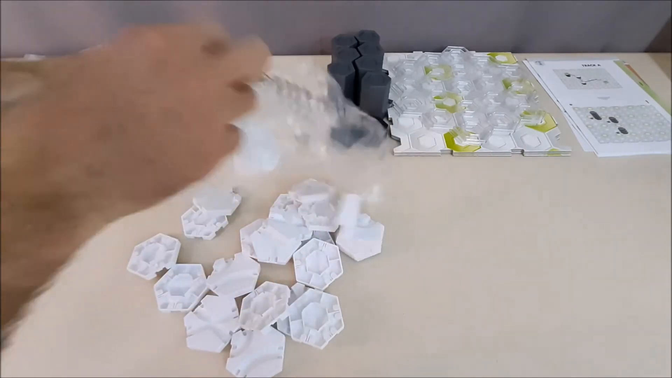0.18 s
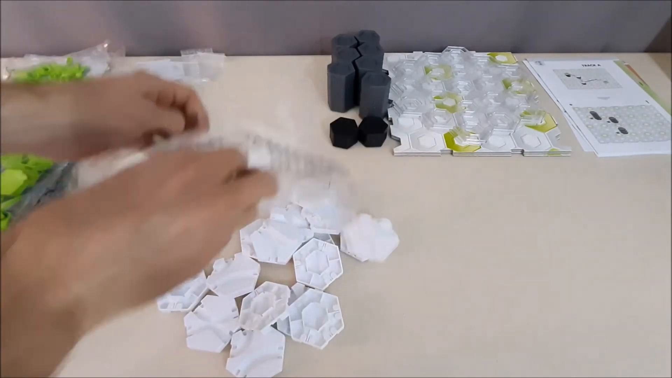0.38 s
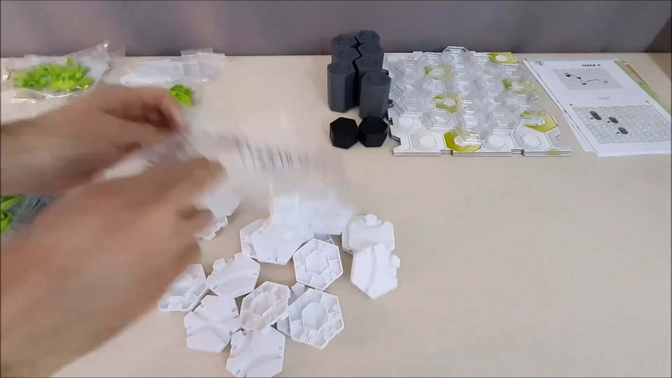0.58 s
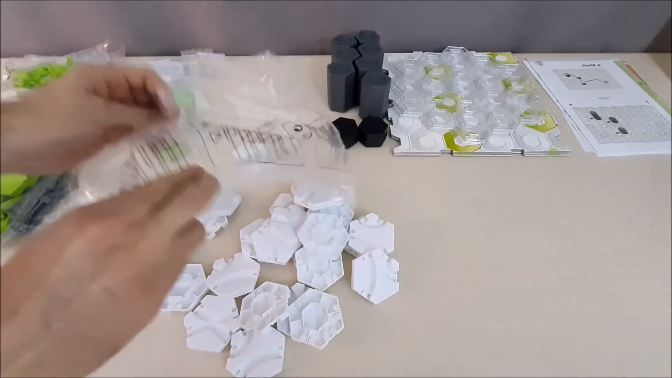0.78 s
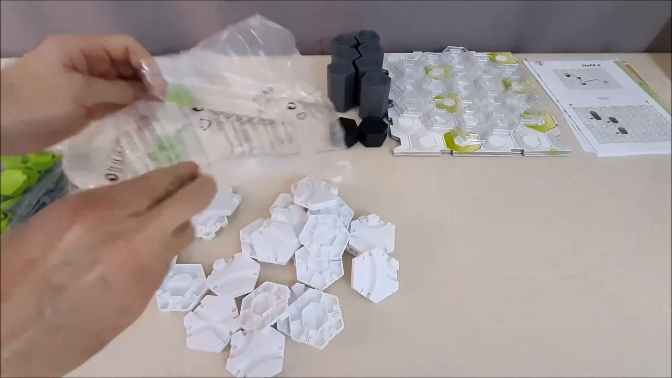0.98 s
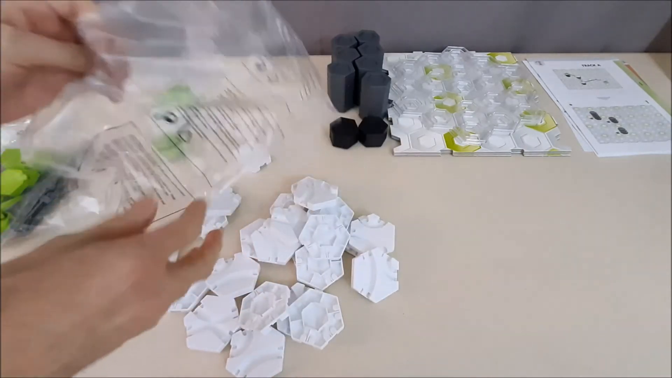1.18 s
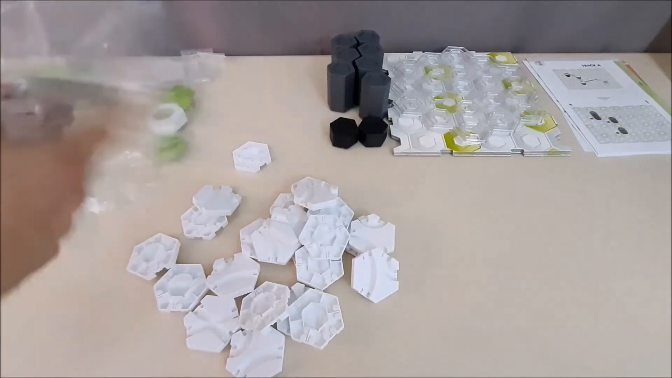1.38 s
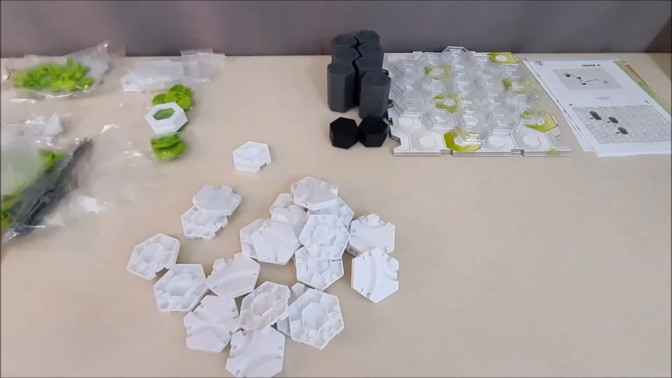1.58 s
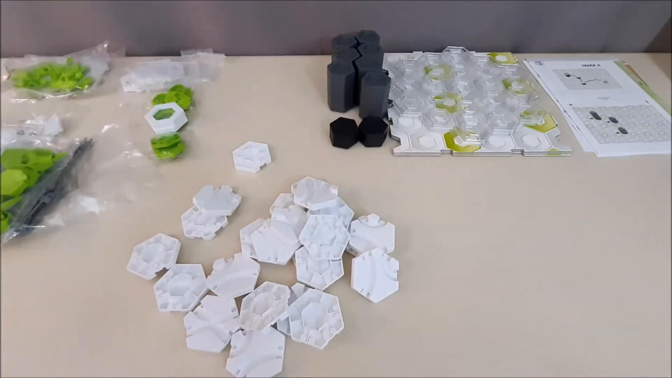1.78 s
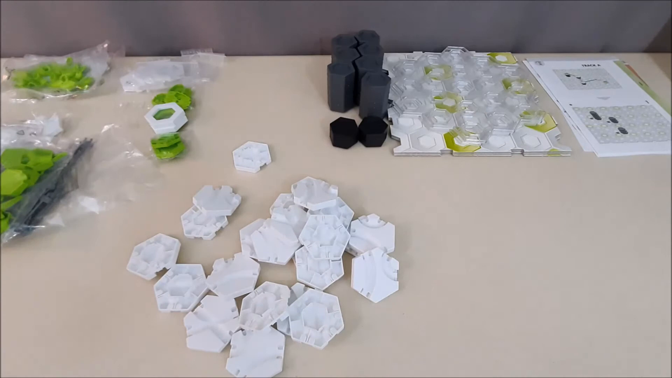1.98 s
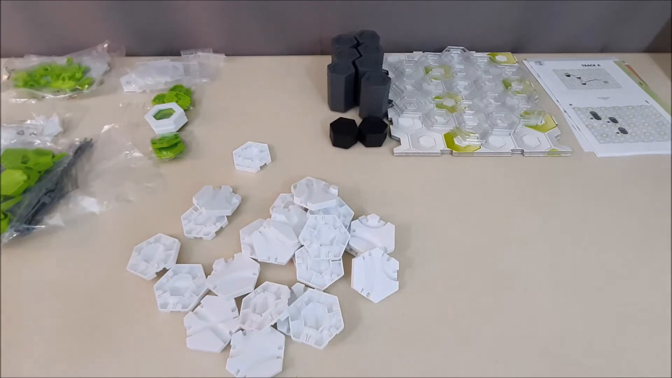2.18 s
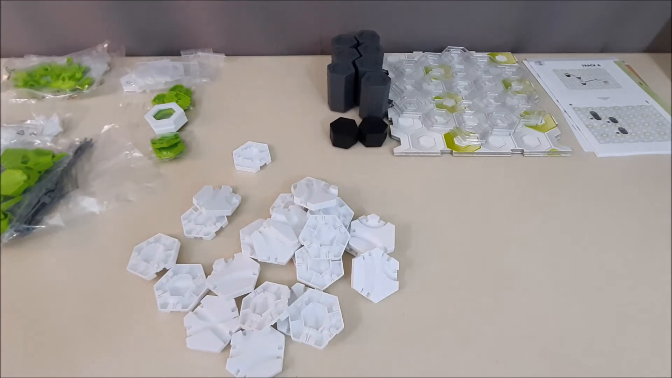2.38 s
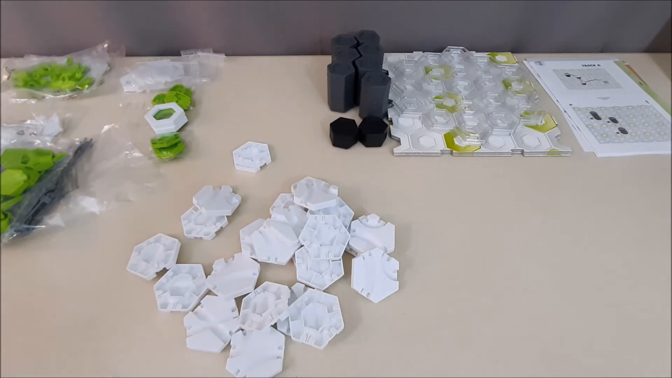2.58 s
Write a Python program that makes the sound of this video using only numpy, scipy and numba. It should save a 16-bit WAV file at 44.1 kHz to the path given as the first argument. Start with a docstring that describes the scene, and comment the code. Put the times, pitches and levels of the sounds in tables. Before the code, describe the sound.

Hollow plastic tiles spill onto a table. Faint thin-bag crinkles come first, then at 0.2 seconds a sudden dense clatter with bright clacks, a brief thinning, and a second cluster around 0.55-0.7. Small knocks settle until about 1.0. After a near pause, the empty bag crinkles and snaps from 1.1, strongest at 1.35-1.8, slightly left, fading by 2.4. Low table bumps, close small quiet room.

```python
"""Crinkles and snaps of a thin plastic bag, then hollow plastic tiles tumble from it onto a table.
Clacks ring tile modes with a noise crack and a board thud; small knocks chatter as the tiles settle.
The empty bag then crinkles and snaps as it is drawn away: short creases, ticks, snaps and a low rustle.
Deep bumps rumble through the table; a small quiet room adds a diffuse tail and faint floor noise."""
import sys
import numpy as np
from scipy import signal
from scipy.fft import rfft, irfft
from scipy.io import wavfile
from scipy.ndimage import uniform_filter1d
from numba import njit

SR = 44100
rng = np.random.default_rng(int(sys.argv[2]) if len(sys.argv) > 2 else 0)


def natural_amplitude(level_db):
    """Convert a level in decibels to a linear amplitude factor, elementwise."""
    exponent = np.asarray(level_db, float) / 20
    return 10 ** exponent


def put_to_file(sound):
    """Save the sound as 16-bit audio at rate SR, in the file named by the first command-line argument."""
    columns = np.atleast_2d(sound).T  # one column per channel
    safe = np.clip(columns, -1, 1)
    whole_steps = np.round(safe * 32767)
    wavfile.write(sys.argv[1], SR, whole_steps.astype(np.int16))


N = 114660

# floor noise spectrum: f/Hz, relative density/dB
FLOOR_COLOUR = [(18, -33), (30, -15), (90, -6.5), (540, -11), (1600, 2), (8740, -21), (16000, -23)]
# room tail: f/Hz, level/dB, t60/s
ROOM_TAIL = [(125, -10, 0.095), (500, -6, 0.23), (2000, -5, 0.24), (6040, -8, 0.089), (12000, -8, 0.037)]
# rumble as hands and bag bump the table: t/s, level/dB
RUMBLE_LEVEL = [(0, -61), (.1, -54.5), (.17, -67), (.24, -41), (.4, -80), (.7, -48), (.85, -61), (1.0, -67),
                (1.25, -75), (1.34, -56), (1.38, -44.5), (1.45, -47), (1.5, -77), (1.62, -75), (1.75, -58),
                (1.82, -69), (1.87, -93), (2.05, -89), (2.2, -75), (2.4, -82), (2.6, -78)]
# rumble spectrum: f/Hz, relative density/dB
RUMBLE_COLOUR = [(15, -18), (35, 0), (65, -3.5), (110, -5), (200, -35.5), (500, -78.5)]
# bag handling: t/s, crinkle level/dB, low rustle level/dB, delay of left/samples
BAG_HANDLING = [(0, -52.5, -56, -7.5), (.04, -42.5, -55.5, 7), (.12, -39, -58, 6.5),
                (.205, -46, -54.5, 5.5), (.235, -18.5, -42, -4), (.4, -52, -43.5, 4.5),
                (.46, -37, -44.5, -2.5), (.55, -48, -41.5, -0.5), (.7, -25, -37, -0.5),
                (.9, -42, -43.5, -5), (1.04, -73, -64, -12.5), (1.09, -56, -60, -9.5),
                (1.14, -40.5, -53, -10), (1.21, -64, -66.5, -11.5), (1.25, -54.5, -64, -11),
                (1.31, -43.5, -59, -16), (1.36, -34, -43.5, -11.5), (1.4, -30.5, -40, -14),
                (1.46, -29.5, -44.5, -17.5), (1.5, -35, -50.5, -15), (1.54, -32.5, -54, -19.5),
                (1.63, -32, -50.5, -18.5), (1.73, -44.5, -54.5, -20.5), (1.8, -29.5, -46.5, -18.5),
                (1.87, -40, -61.5, -17), (1.95, -34.5, -54.5, -22.5), (2.08, -36, -68, -20.5),
                (2.16, -46.5, -75, -21.5), (2.23, -59, -87, -21.5), (2.31, -42, -67.5, -25.5),
                (2.42, -54, -74, -19.5), (2.475, -58.5, -78.5, -26.5), (2.6, -76.5, -83, -20)]
# bag position: t/s, left over right/dB
BAG_PAN = [(.6, 0), (1.1, 1.6), (1.4, 2.6), (2.1, 1.8), (2.4, 0)]
# gain of crinkle treble above 6 kHz: t/s, gain/dB
BAG_TREBLE = [(0, -5), (.25, -5), (.5, -5.5), (.7, -6.5), (1, -23.5), (1.18, -0.5), (1.3, -11),
              (1.42, -4.5), (1.53, -1.5), (1.7, -2.5), (1.8, 2.5), (1.95, -1), (2.1, -3.5), (2.3, -3.5),
              (2.42, -10.5), (2.47, 3), (2.6, -8)]
# film filter: f/Hz, gain/dB
FILM_COLOUR = [(300, -23), (700, -12.5), (1250, -7.5), (2030, -5.5), (2980, -4.5), (5000, -4.5), (7690, -4),
               (8790, -14.5), (11000, -6), (14000, -6), (15900, -7.5), (17000, -46)]
# rustle filter: f/Hz, gain/dB
RUSTLE_COLOUR = [(70, -22), (140, -3.5), (250, -1.5), (600, -6.5), (1200, -11.5), (3000, -64)]
# snaps of the film: t/s, relative level/dB, tone f/Hz
SNAPS = [(0.0286, -29.5, 2030), (0.0913, -31, 5000), (0.1162, -21, 4970), (0.192, -25, 5000),
         (1.064, -32.5, 3880), (1.0973, -35.5, 5760), (1.11, -42, 4900), (1.1187, -26, 3460),
         (1.1335, -32, 6430), (1.139, -43, 3730), (1.179, -19.5, 5700), (1.224, -31.5, 3950),
         (1.258, -29, 4700), (1.2721, -24.5, 5770), (1.284, -38, 5390), (1.304, -36, 7000),
         (1.3132, -26, 3030), (1.3208, -19, 3800), (1.34, -27, 3650), (1.378, -25, 4530),
         (1.3987, -12.5, 1750), (1.4084, -12.5, 5530), (1.4144, -18, 4430), (1.5274, -10.5, 5840),
         (1.5566, -20, 4800), (1.5656, -20, 2000), (1.5833, -25, 4870), (1.6232, -15, 2060),
         (1.7149, -20.5, 4800), (1.7655, -19, 2700), (1.788, -16, 6080), (1.792, -20, 4440),
         (1.8004, -14, 7700), (1.8124, -42, 3910), (1.8909, -20, 3990), (1.944, -20, 4120),
         (1.992, -20, 3820), (2.06, -34, 3350), (2.0955, -26, 1970)]
# settling tiles: t/s, relative level/dB, favoured mode f/Hz
CHATTER = [(.212, -58, 2810), (.224, -24.5, 2790), (.26, -24, 2823), (.32, -25, 2804), (.412, -40.5, 2835),
           (.445, -30, 2880), (.47, -27, 2890), (.55, -44.5, 2910), (.575, -31.5, 964), (.65, -21, 2000),
           (.71, -19, 2600), (.76, -46.5, 1500), (.8, -24.5, 1500), (.86, -36, 1500), (.9, -40.5, 1500),
           (.96, -42.5, 1500), (1.03, -60.5, 1500)]
# clacks: t/s, relative level/dB, favoured mode f/Hz, board thud re clack/dB, crack re clack/dB
CLACKS = [(0.2123, -19.5, 2604, -35.5, -1.5), (0.2219, -5.5, 1858, -18.5, 9.5),
          (0.2243, -8.5, 2705, -11, 3), (0.2299, -13.5, 2640, -23.5, -7), (0.2349, -10.5, 2703, -23.5, 8),
          (0.2408, -7, 5260, -34.5, 7.5), (0.247, -10, 2692, -21, 6.5), (0.257, -8.5, 2920, -19.5, 7.5),
          (0.266, -14.5, 2660, -18.5, -6), (0.273, -8.5, 2697, -14, -2.5), (0.285, -9, 2773, -19, -5),
          (0.2924, -6.5, 3007, -13.5, -14.5), (0.3, -17.5, 4420, -24, -3.5),
          (0.3085, -24.5, 2630, -24.5, 5), (0.349, -19.5, 2730, -13.5, -5), (0.4163, -11.5, 3280, -24, -2),
          (0.438, -18, 4460, -33.5, 4.5), (0.4422, -15, 2920, -10, 8.5), (0.446, -1, 2950, -31.5, -9),
          (0.453, -18, 2920, -40, -4.5), (0.4631, -18.5, 3100, -27.5, 5.5), (0.492, -30, 2940, -7, -3),
          (0.568, -4.5, 1010, -31, -9), (0.573, -7, 764, -15.5, -19), (0.5841, -3.5, 2793, -21, -7),
          (0.593, -8.5, 2844, -14, -13), (0.611, -9.5, 3980, -17.5, 1.5), (0.616, -9, 1050, -12.5, 0),
          (0.6398, -18.5, 1452, -13.5, -5.5), (0.644, -17, 1500, -1, 13), (0.655, -16, 2625, -30.5, -5),
          (0.662, -15, 4350, -34, -6), (0.6815, -13, 2670, -26, 4.5), (0.694, -12, 4470, -23, 2.5),
          (0.7143, -18, 1010, -14, 11.5), (0.725, -33, 2490, -13, -3), (0.761, -20.5, 1500, -10, 3),
          (0.781, -10, 2674, -27, 1.5), (0.783, -19, 1486, -22.5, -2), (0.794, -25, 1500, -26.5, -5),
          (0.809, -23.5, 1452, -9.5, 3), (0.847, -17, 2080, -28, -14), (0.872, -11, 2650, -18, -6.5),
          (0.889, -19, 1500, -21, -17), (0.904, -23.5, 1493, -5, 3), (0.938, -45, 1500, -20, -16),
          (0.954, -37.5, 1544, 1, -16), (1.021, -50.5, 1520, -22, -12)]
# crack filter: f/Hz, gain/dB
CRACK_COLOUR = [(150, -8.5), (500, -4), (1500, -5), (2800, 0.5), (5500, -4), (7700, -7.5), (8800, -14),
                (12000, -7.5), (16000, -21.5)]
# modes of one tile, before detuning: f/Hz, relative level/dB, t60/s
TILE_MODES = [(635, -2, 0.029), (790.5, -4.5, 0.059), (1010, 6, 0.015), (1500, -4, 0.09),
              (1828, 0.5, 0.024), (2070, -2.5, 0.039), (2263, -13.5, 0.02), (2636, -4, 0.067),
              (2800, 4.5, 0.017), (2920, 3, 0.018), (3350, 4, 0.014), (3890, -6, 0.028), (4366, -4, 0.051),
              (5002, -1, 0.031), (6030, -17, 0.0033)]
# modes of the table board, before detuning: f/Hz, relative level/dB, t60/s
BOARD_MODES = [(63, -21.5, 0.044), (136, -6.5, 0.19), (183.8, -2.5, 0.082), (259.5, 5.5, 0.043),
               (394, 1, 0.031), (520, 1.5, 0.066)]

FAVOUR_OCT, MODE_SCATTER_DB, DETUNE_RATIO = .065, 2, 0.0283
LAG_SCATTER_SAMPLES = 1.3
SNAP_T60_S, SNAP_TAIL_DB, SNAP_TAIL_S = 0.0045, -16, 0.052


def curve(table, k, t):
    """Column k of a table at times t."""
    a = np.array(table, float)
    return np.interp(t, a[:, 0], a[:, k])


def colour(x, table):
    """Minimum-phase filter through (f/Hz, gain/dB) points."""
    a = np.array(table, float)
    f = np.maximum(np.arange(1025) * SR / 2048, 1)
    log_gain = np.interp(np.log(f), np.log(a[:, 0]), a[:, 1]) * np.log(10) / 20
    # fold the cepstrum: the response becomes causal
    cepstrum = irfft(log_gain)
    cepstrum[1:1024] *= 2
    cepstrum[1025:] = 0
    response = irfft(np.exp(rfft(cepstrum)))
    return signal.fftconvolve(x, response[None], axes=1)[:, :N]


def unit(x):
    """Scale to rms 1."""
    return x / np.sqrt(np.mean(x ** 2))


def wide_noise(side):
    """Stereo noise: a common part plus an opposed part of relative size side."""
    v = rng.standard_normal((2, N))
    return v[:1] + side * v[1] * np.array([[1], [-1]])


@njit
def ring(n, s, hz, t60, size, rise, lag, pan):
    """Damped sines; rise (per sample) slows the onset, lag shifts left in samples, pan is a gain."""
    out = np.zeros((2, n + 8192))
    for k in range(len(s)):
        p = np.exp(2j * np.pi * hz[k] / SR - np.log(1000) / (t60[k] * SR))
        for ch in range(2):
            i0 = max(int(s[k] * SR + (lag[k] if ch == 0 else 0)), 0)
            z, a = size[k] * (pan[k] if ch == 0 else 1 / pan[k]) + 0j, 1.
            for i in range(min(int(t60[k] * SR * .75) + 2, 8000)):
                z, a = z * p, a * rise
                out[ch, i0 + i] += z.imag * (1 - a)
    return out[:, :n]


def strike(s, db, favour_hz, modes, favour_db, contact_s):
    """Each blow rings all modes, freshly weighted and detuned; the favoured one is lifted by favour_db."""
    hz, mode_db, t60 = np.array(modes, float).T
    r = rng.standard_normal((len(s), len(hz) + 2, 2))
    octaves = np.log2(hz / favour_hz[:, None])
    near_db = favour_db * (np.exp(-.5 * (octaves / FAVOUR_OCT) ** 2) - 1)
    scatter_db = MODE_SCATTER_DB * r[:, 2:, 0] * (abs(octaves) > FAVOUR_OCT / 2)
    size = natural_amplitude(mode_db + near_db + scatter_db) * np.sign(r[:, 2:, 0] * r[:, 2:, 1])
    size *= natural_amplitude(db[:, None]) / np.sqrt((size ** 2).sum(axis=1, keepdims=True))

    # shift all modes so the nearest meets the favoured f, by 0.1 octave at most
    gap = octaves[np.arange(len(s)), abs(octaves).argmin(axis=1)][:, None]
    detune = 1 + DETUNE_RATIO * r[:, 2:, 1] * np.tanh(abs(octaves - gap) * 20)
    hz = hz * 2 ** -np.clip(gap, -.1, .1) * detune

    def flat(v):
        """One value per blow and mode."""
        return (v * np.ones_like(size)).ravel()

    rise = np.exp(-1 / (contact_s * SR))
    lag = LAG_SCATTER_SAMPLES * r[:, :1, 0]
    pan = natural_amplitude(0.43 * np.tanh(r[:, 1:2, 0]) + 1.7 * r[:, 2:, 1])
    return ring(N, flat(s[:, None]), flat(hz), flat(np.clip(t60, .002, .2)), size.ravel(), rise,
                flat(lag), flat(pan))


def bursts(s, db, t60, tail_db, tail_s, lag, pan_db):
    """Sharp noise bursts with a softer after-fizz, shared by both channels with a lag in samples."""
    out, t = np.zeros((2, N + 2000)), np.arange(1800) / SR
    shape = natural_amplitude(-60 * t / t60) + natural_amplitude(tail_db - 60 * t / tail_s)
    noise = rng.standard_normal((len(s), len(t))) * shape
    for t0, level_db, shift, p, v in zip(s, db, lag, pan_db, noise):
        v = v * natural_amplitude(level_db) / np.abs(v).max()
        starts = max(int(t0 * SR + shift), 0), int(t0 * SR)
        for ch, i in enumerate(starts):
            out[ch, i:i + len(t)] += v * natural_amplitude(p / 2 - ch * p)
    return out[:, :N]


def floor_noise():
    """Faint steady noise, independent left and right."""
    return unit(colour(rng.standard_normal((2, N)), FLOOR_COLOUR)) * natural_amplitude(-73)


def room(x):
    """Diffuse tail: octave bands of decaying noise, different left and right, dying fast in the treble."""
    t, tail = np.arange(int(.4 * SR)) / SR, 0
    a = np.array(ROOM_TAIL, float)
    for hz in 60 * 2. ** np.arange(9):
        edges_hz = [hz / 1.41, min(hz * 1.41, 21000)]
        sos = signal.butter(2, edges_hz, "band", fs=SR, output="sos")
        band = signal.sosfilt(sos, rng.standard_normal((2, len(t))))
        db, t60 = (np.interp(np.log(hz), np.log(a[:, 0]), a[:, k]) for k in (1, 2))
        decay = natural_amplitude(db - 60 * t / t60) * np.sqrt(2 * np.log(1000) / (t60 * SR))
        tail = tail + band * decay
    tail = tail * np.clip(t / 0.0039 - .3, 0, 1)  # onset just after the direct sound
    return signal.fftconvolve(x, tail, axes=1)[:, :N]


def rumble():
    """Deep bumps through the table: low noise, largely common to left and right."""
    level_db = curve(RUMBLE_LEVEL, 1, np.arange(N) / SR)
    return unit(colour(wide_noise(0.56), RUMBLE_COLOUR)) * natural_amplitude(level_db)


def bag_rustle():
    """Low rustle on the board: noise with a slow random flutter in level."""
    smooth = uniform_filter1d(uniform_filter1d(rng.standard_normal(N), 500), 500)
    flutter = natural_amplitude(3.36 * unit(smooth))
    rustle = unit(colour(wide_noise(0.31), RUSTLE_COLOUR) * flutter)
    return rustle * natural_amplitude(curve(BAG_HANDLING, 2, np.arange(N) / SR))


def bag_crinkle():
    """Film buckling: dense few-cycle creases and small noise ticks, of widely spread sizes."""
    crease_count, tick_count, spread_db = 40000, 500, 2.5
    r = rng.random((crease_count, 5))
    s, hz = r[:, 0] * N / SR, 300 + 16000 * r[:, 1]
    size = natural_amplitude(-spread_db * np.log(r[:, 2] + 0.000067)) * np.sqrt(hz)
    lag = curve(BAG_HANDLING, 3, s) + 10 * (r[:, 3] - .5)
    pan = natural_amplitude(curve(BAG_PAN, 1, s) / 2 + 16.0 * (r[:, 4] - .5))
    creases = ring(N, s, hz, 6 / hz, size, 0., lag, pan)  # t60 of 6 cycles

    r = rng.random((tick_count, 2))
    s = r[:, 0] * N / SR
    tick_db = -3 * np.log(r[:, 1] + 0.023)
    ticks = bursts(s, tick_db, SNAP_T60_S, -27, 0.032, curve(BAG_HANDLING, 3, s), curve(BAG_PAN, 1, s))

    film = unit(colour(unit(creases) + natural_amplitude(-5) * unit(ticks), FILM_COLOUR))
    t = np.arange(N) / SR
    treble = signal.sosfiltfilt(signal.butter(2, 6000, "high", fs=SR, output="sos"), film)
    film = film + treble * (natural_amplitude(curve(BAG_TREBLE, 1, t)) - 1)
    return film * natural_amplitude(curve(BAG_HANDLING, 1, t))


def bag_snaps():
    """Louder snaps of the film: a noise burst plus a short damped tone."""
    s, db, hz = np.array(SNAPS, float).T
    lag, pan_db = curve(BAG_HANDLING, 3, s), curve(BAG_PAN, 1, s)
    noise = bursts(s, db + 5.5, SNAP_T60_S, SNAP_TAIL_DB, SNAP_TAIL_S, lag, pan_db)
    tone = ring(N, s + 0, hz + 0, 12 / hz, natural_amplitude(db - 4), 0., lag, natural_amplitude(pan_db / 2))
    return colour(noise, FILM_COLOUR) + tone


def chatter():
    """Many small knocks between settling tiles: tile modes, noise ticks, every fourth also on the board."""
    knock_count, spread_db = 900, 2.5
    r = rng.random((knock_count, 3))
    s = .2 + .9 * r[:, 0]
    db = curve(CHATTER, 1, s) - spread_db * np.log(r[:, 1] + 0.018)
    hz = curve(CHATTER, 2, s) * 2 ** (.04 * (r[:, 2] - .5))
    tiles = strike(s, db - 8, hz, TILE_MODES, 8.8, 0.00019)
    board = strike(s[::4], db[::4] - 12.5, 255 + 0 * s[::4], BOARD_MODES, 0, 0.0052)
    ticks = bursts(s, db - 0.5, 0.0036, -24.5, .03, 6 * r[:, 2] - 3, 0 * s)
    return tiles + board + colour(ticks, CRACK_COLOUR)


def clacks():
    """Tile impacts: ringing tile modes, a noise crack at contact and the thud of the board."""
    s, db, hz, thud_db, crack_db = np.array(CLACKS, float).T
    lag = LAG_SCATTER_SAMPLES * rng.standard_normal(len(s))
    crack = bursts(s, db + crack_db, 0.009, -7, 0.04, lag, 0 * s)
    tiles = strike(s, db - 3, hz, TILE_MODES, 14, 0.0008)
    thud = strike(s, db + thud_db, 255 + 0 * s, BOARD_MODES, 0, 0.0017)
    return tiles + colour(crack, CRACK_COLOUR) + thud


def scene():
    """Tiles, bag and rumble in the room over a faint floor."""
    bag = bag_rustle() + bag_crinkle() + bag_snaps()
    direct = rumble() + bag + chatter() + clacks()
    return direct + room(direct) + floor_noise()


def roll_off(x):
    """The treble ends steeply here."""
    return signal.sosfilt(signal.butter(12, 16980, fs=SR, output="sos"), x)


def record(dry):
    """Recording chain: drops the deepest bass, band-limits the top near 15.85 kHz, rounds the loudest peaks."""
    low_hz, top_hz = 61, 15850
    x = signal.sosfilt(signal.butter(2, low_hz, "high", fs=SR, output="sos"), dry)
    x = signal.sosfilt(signal.ellip(8, .2, 65, top_hz, fs=SR, output="sos"), x)
    mix = np.tanh(0.85 * x) / 0.75
    return roll_off(mix)


dry = scene()
out = record(dry)
put_to_file(out)
```